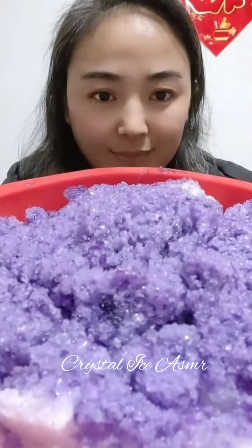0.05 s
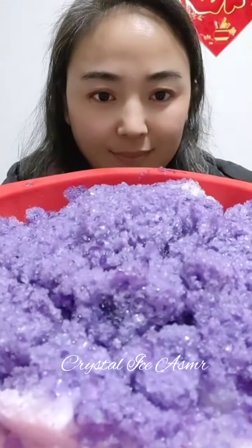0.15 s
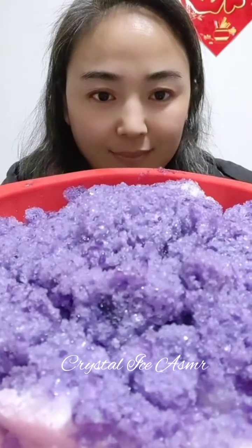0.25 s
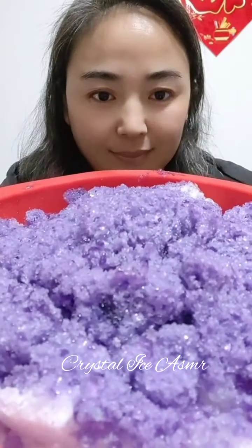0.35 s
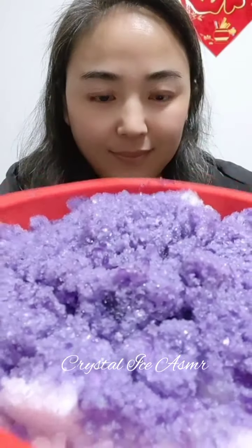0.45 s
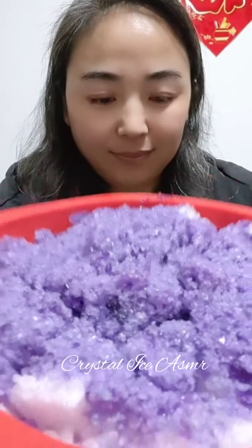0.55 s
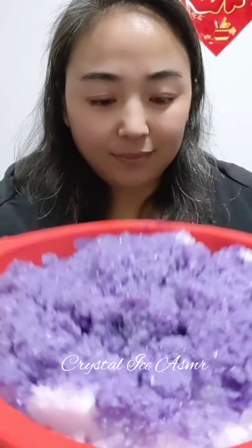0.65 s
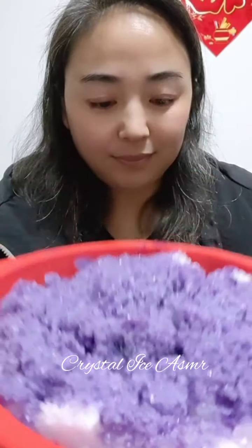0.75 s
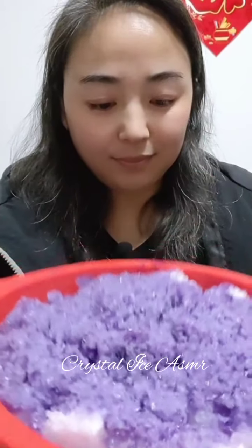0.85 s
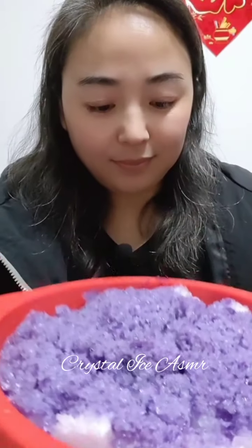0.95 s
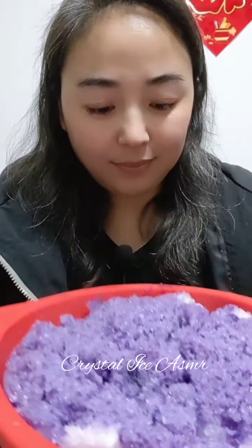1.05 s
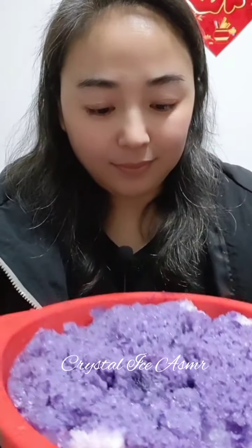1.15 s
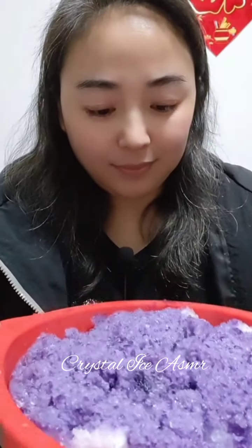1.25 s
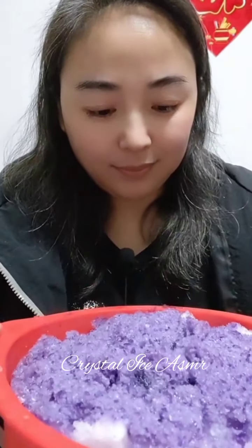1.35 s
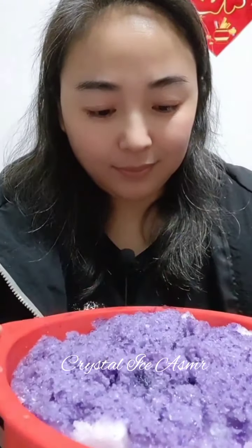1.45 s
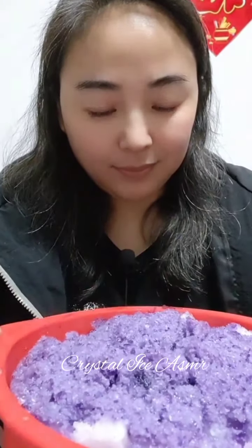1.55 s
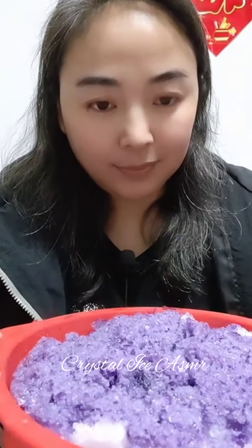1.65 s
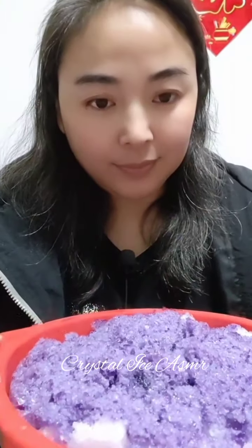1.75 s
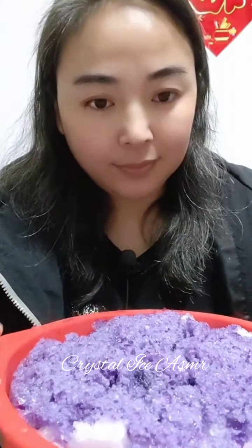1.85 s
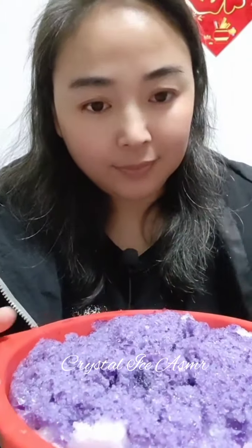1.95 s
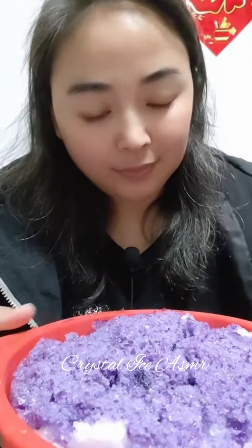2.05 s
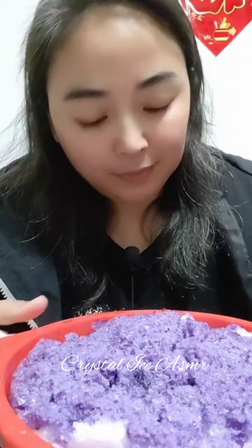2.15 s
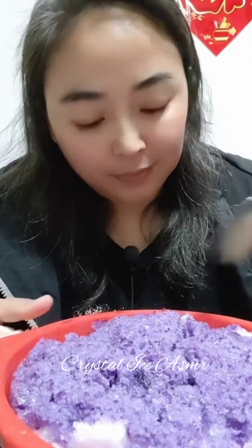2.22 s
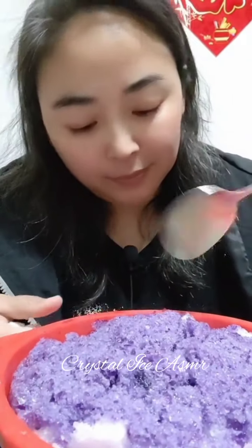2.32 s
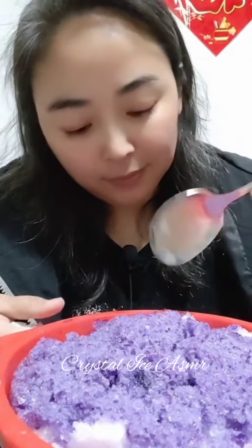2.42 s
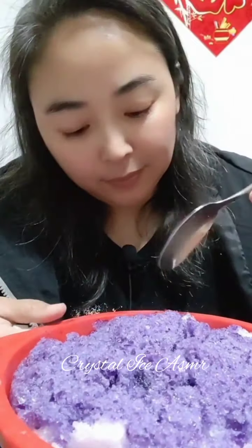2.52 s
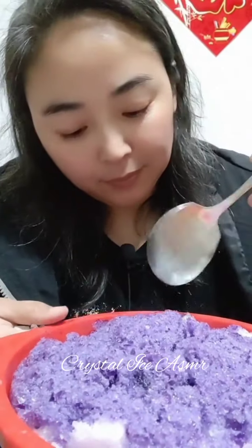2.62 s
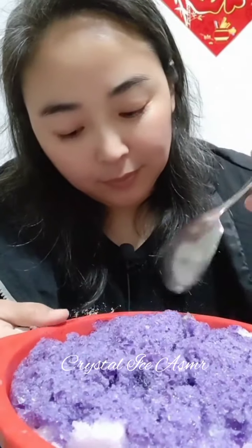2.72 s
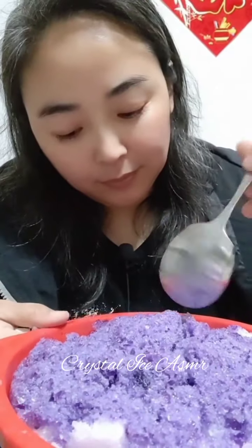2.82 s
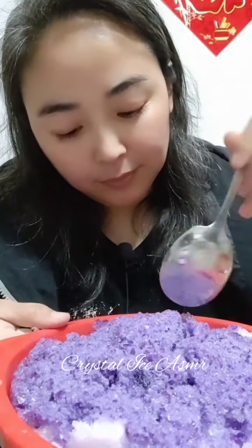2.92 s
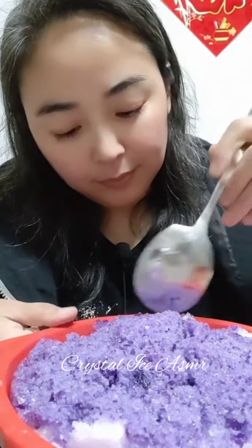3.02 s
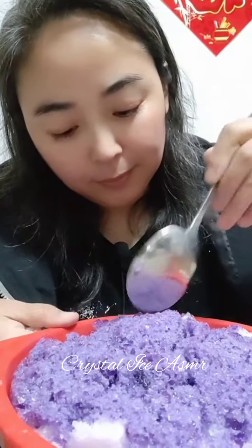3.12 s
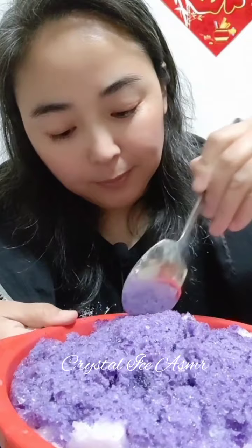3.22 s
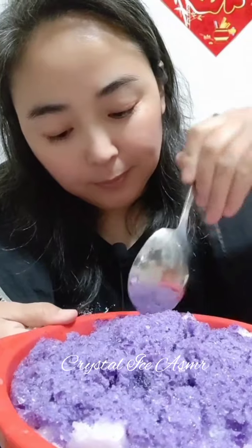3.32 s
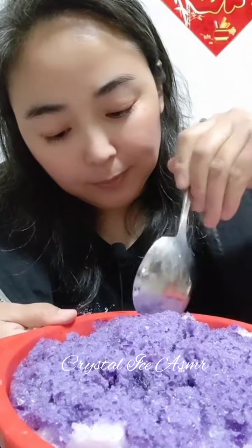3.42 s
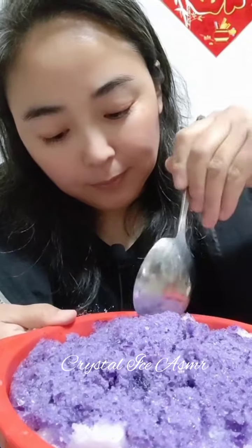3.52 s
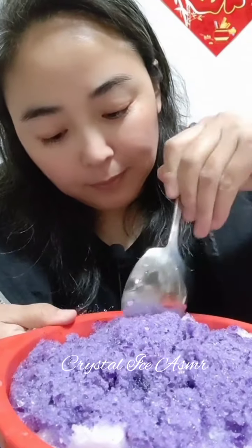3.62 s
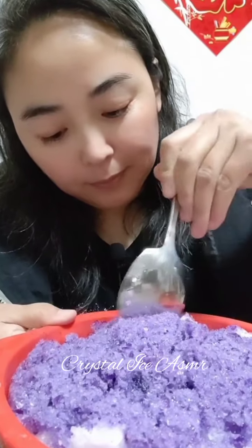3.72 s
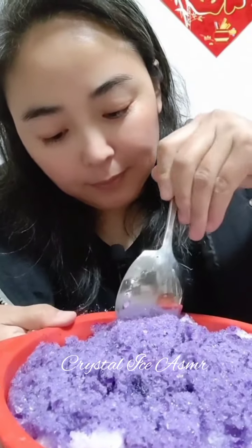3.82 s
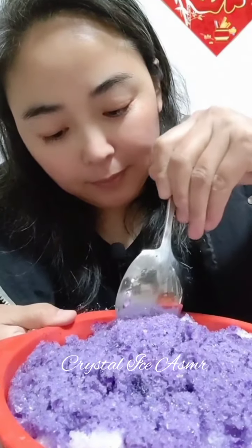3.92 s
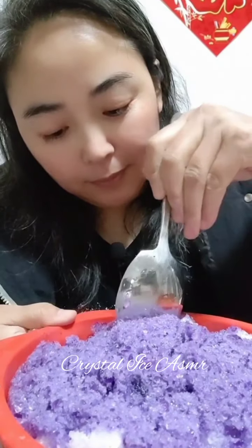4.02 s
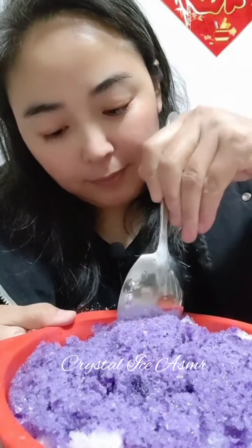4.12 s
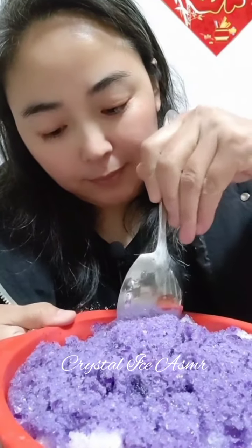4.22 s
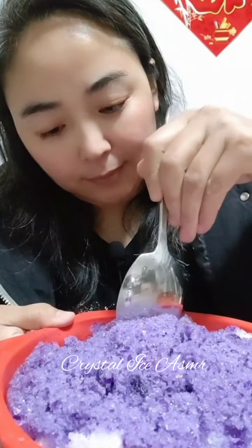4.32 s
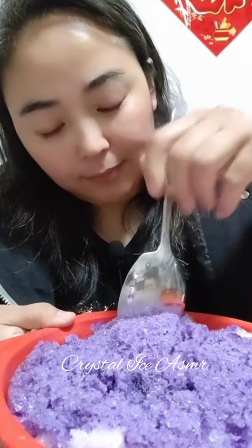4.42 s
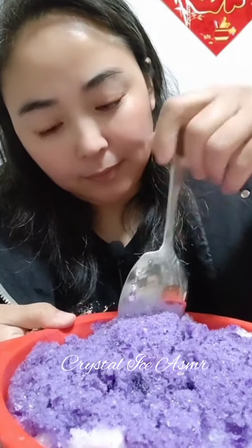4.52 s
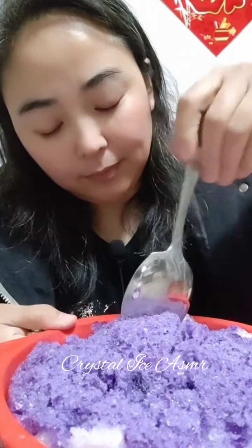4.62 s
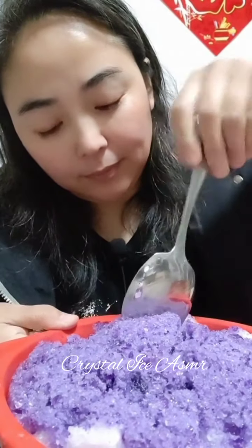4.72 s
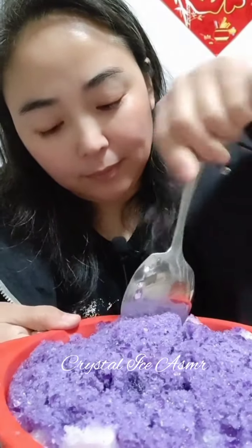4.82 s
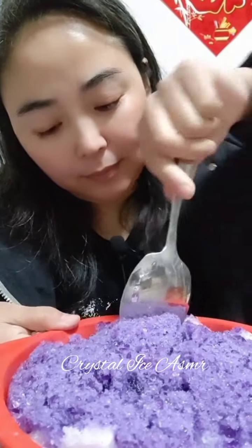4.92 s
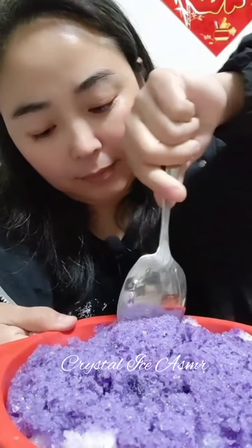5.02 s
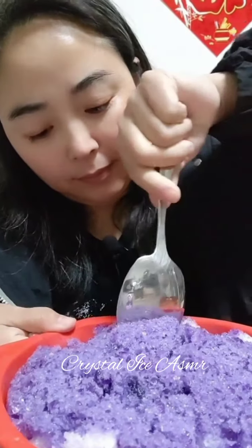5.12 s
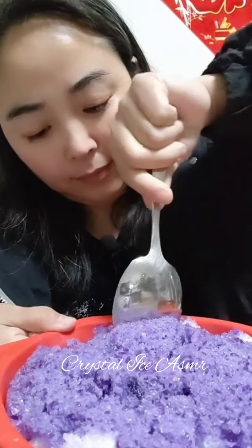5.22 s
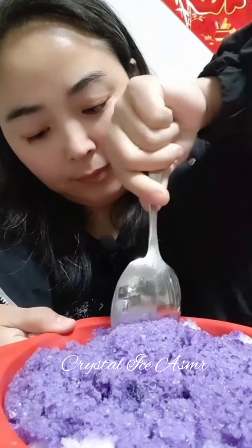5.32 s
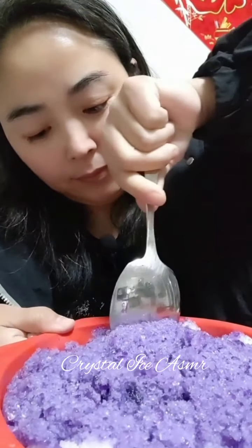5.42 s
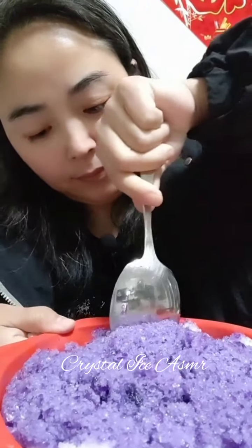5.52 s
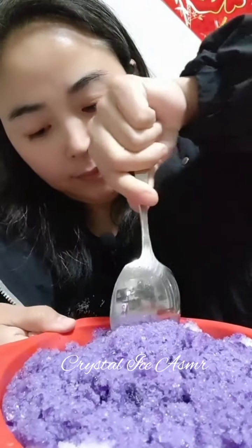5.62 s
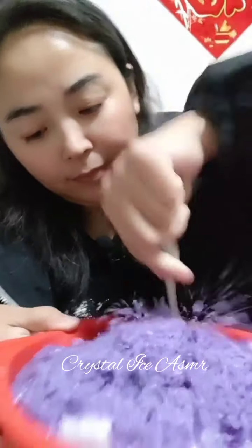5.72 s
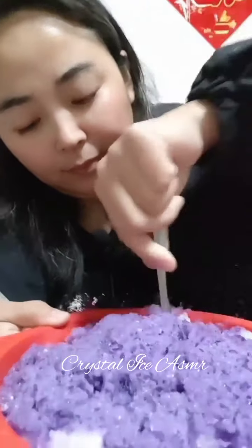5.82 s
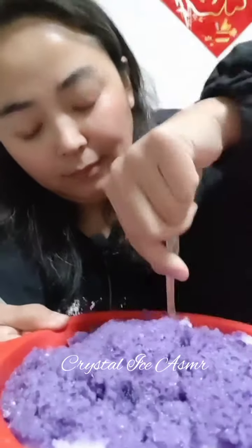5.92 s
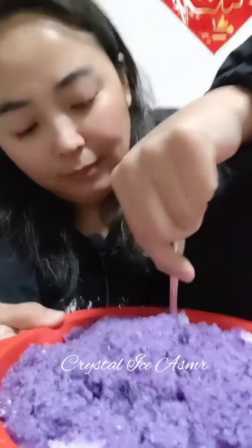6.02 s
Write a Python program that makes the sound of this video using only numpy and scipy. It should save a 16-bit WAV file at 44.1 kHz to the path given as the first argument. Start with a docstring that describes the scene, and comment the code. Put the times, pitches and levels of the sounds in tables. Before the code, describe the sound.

A small furnished room, nearly silent, heard from a microphone on a jacket. At 0 s a faint bowl bump and cloth flick, a tiny bright tick at 0.5, a dull bump near 1.4. From 1.7 to 3.3 fabric rubs and flaps softly, with light bowl taps around 2.8 and 3.1. At 3.3 a steel spoon touches packed shaved ice; gritty slips thicken from 3.6, with a thin, very high steel note fading. A hollow plastic-bowl crack lands at 3.95, a crisp crunch with a thump at 4.25. From 4.35 to 5.0 quieter grinding, creaks and fine crackle. Harder snaps and knocks come at 5.1-5.35 and 5.5, each brief, with low thumps. After small cracks, at 5.83-5.95 the chunk bursts loose: a massive, booming, saturated crunch. A chip clicks at 6.0 as the bowl's ring dies.

```python
"""Small furnished room, microphone on a jacket: cloth rustles as a steel spoon nears a plastic bowl of packed shaved ice.
The spoon sinks in by short gritty slips: random grains excite spoon, ice block and bowl; one thin steel note fades.
Fractures mix noise snaps with damped ice and wall modes; jolts add bowl modes and a low thump.
Finally the spoon is levered hard, a chunk bursts loose and overloads the microphone, and a flung chip lands."""
import sys
import numpy as np
from scipy import signal
from scipy.fft import rfft, irfft, next_fast_len
from scipy.io import wavfile
from scipy.ndimage import uniform_filter1d, map_coordinates

SR = 44100
rng = np.random.default_rng(int(sys.argv[2]) if len(sys.argv) > 2 else 0)


def master(y):
    """Save y as 16-bit WAV."""
    cut = np.clip(np.atleast_2d(y).T, -1, 1)
    pcm = np.round(cut * 32767)  # scale
    wavfile.write(sys.argv[1], SR, pcm.astype(np.int16))


N = 267157
TIME = np.arange(N) / SR


def amp(db):
    """Decibels to gain."""
    return 10 ** (np.asarray(db) / 20)


def unit(x):
    """Scale to rms 1."""
    return x / np.sqrt(np.mean(x ** 2) + 1e-20)


def struck(x):
    """Scale a blow to rms 1 over its first 6 ms."""
    return x / np.sqrt(np.mean(x[:round(0.006 * SR)] ** 2) + 1e-20)


def along(points, hz):
    """Interpolate (Hz, value) points on a log frequency axis."""
    f, v = np.transpose(points)
    return np.interp(np.log(hz + 1), np.log(f + 1), v)


def curves(rows):
    """One value per sample for each column after the time."""
    s, *cols = np.transpose(rows)
    return [np.interp(TIME, s, c) for c in cols]


def wobble(rate):
    """Smooth random curve, rate knots per second."""
    knots = rng.standard_normal(int(N * rate / SR) + 4)
    return map_coordinates(knots, [TIME * rate])


def add(track, s, sound):
    """Mix a sound into a track at time s."""
    part = track[round(s * SR):][:len(sound)]
    part += sound[:len(part)]


def colour(x, spectrum, size=4096):
    """Minimum-phase filter with the given spectrum shape; white input keeps its power."""
    level_db = along(spectrum, np.fft.rfftfreq(size, 1 / SR))
    cepstrum = irfft(np.log(amp(level_db)))
    # folding the cepstrum makes the filter causal
    cepstrum[1:size // 2] *= 2
    cepstrum[size // 2 + 1:] = 0
    response = irfft(np.exp(rfft(cepstrum)))
    return signal.fftconvolve(x, response / np.linalg.norm(response))[:len(x)]


def resonate(x, peaks):
    """Parallel (Hz, width Hz, dB) resonances; white input keeps its power."""
    f = np.fft.rfftfreq(SR // 4, 1 / SR)
    response = irfft(sum(amp(db) * 1j * f * w / (c * c - f * f + 1j * f * w) for c, w, db in peaks))
    return signal.fftconvolve(x, response / np.linalg.norm(response))[:N]


def grains(rate, spread_db, clump_db):
    """Random impulses of rms 1: many small, a few large, bunched into clumps of a few ms."""
    sizes = amp(spread_db * np.minimum(rng.exponential(size=N), 4))
    hits = (rng.random(N) < rate / SR) * rng.choice([-1, 1], N)
    return unit(hits * sizes * amp(clump_db * wobble(230)))


def ring(modes, t, scatter_db, detune):
    """Damped modes, with new strengths and slightly new pitches at every blow."""
    out = 0
    for hz, db, t60 in modes:
        strength, pitch = rng.standard_normal(2)
        decay = amp(db + scatter_db * strength - 60 * t / t60)
        out = out + decay * np.sin(2 * np.pi * hz * (1 + detune * pitch) * t)
    return out


def radiated(x):
    """A thin wall pushes little air below its lowest mode."""
    return signal.sosfilt(signal.butter(4, 170, "highpass", fs=SR, output="sos"), x)


def stroke(start, hold, rise, t60):
    """Gain of one movement: it swells up to start, holds and dies away."""
    swell_db = -20 * (np.maximum(start - TIME, 0) / max(rise, 1e-4)) ** 1.4
    fade_db = -60 * np.maximum(TIME - start - hold, 0) / t60
    return amp(np.maximum(swell_db + fade_db, -150))


# spectrum of the quiet room: f/Hz, relative level/dB
QUIET_SPECTRUM = [(15, -29), (25, 6), (56, -1), (185, -15.5), (301, -19.5), (416, -20), (530, -20),
                  (961, -29.5), (16000, -40)]


def quiet_room():
    """Steady coloured noise under everything."""
    return amp(-65.5) * colour(rng.standard_normal(N), QUIET_SPECTRUM)


# bowl moved, set down, steadied: t/s, level/dB
BOWL_BUMPS = [(0.002, -41), (1.387, -38.5), (1.52, -45), (2.777, -40), (3.087, -40)]
# bowl base modes: f/Hz, relative level/dB, t60/s
BASE_RINGING = [(122, -17.5, 0.3), (333.7, 0, 0.16), (384, 0, 0.089), (527.5, -11, 0.19),
                (1007, -2.5, 0.052)]


def bowl_bumps():
    """Light bumps ring only the damped modes of the bowl's base."""
    out, t = np.zeros(N), np.arange(SR // 2) / SR
    for s, db in BOWL_BUMPS:
        add(out, s, amp(db) * struck(ring(BASE_RINGING, t, scatter_db=2, detune=0.02)))
    return out


# jacket folds flipping over: t/s (sounds 2.04 ms later), relative level/dB, tap f/Hz
JACKET_FOLDS = [(0.009, -28.5, 710), (0.056, -43, 470), (0.697, -43, 647), (0.911, -38.5, 700),
                (0.95, -33, 915), (1.209, -43, 1000), (1.664, -40.5, 680), (1.699, -37.5, 765),
                (1.764, -32, 660), (1.791, -30, 900), (1.812, -30, 860), (1.833, -22.5, 473),
                (1.918, -25.5, 750), (2.185, -31, 930), (2.533, -29.5, 958), (2.583, -28, 456),
                (2.776, -30, 900), (2.888, -38, 486), (3.02, -28, 710), (3.083, -31, 490),
                (3.112, -29, 624), (3.275, -37.5, 650)]
# cloth spectrum: f/Hz, relative level/dB
CLOTH_SPECTRUM = [(40, -18), (220, -8), (350, 1), (750, -1), (1150, -4), (1700, -15), (2100, -14),
                  (2600, -21), (5800, -25), (8000, -37), (11000, -43), (16000, -55)]


def jacket_folds():
    """A flipping fold gives a burst of cloth noise and a dull, quickly damped tap."""
    out, t = np.zeros(N), np.arange(SR // 8) / SR
    for s, db, hz in JACKET_FOLDS:
        rub = rng.standard_normal(len(t)) * (amp(-60 * t / 0.04) + amp(-12 - 60 * t / 0.089))
        tap = np.sin(2 * np.pi * hz * t) * amp(-60 * t * hz / 11)  # t60 is 11 cycles
        flip = struck(colour(rub, CLOTH_SPECTRUM)) + 2.15 * struck(tap)
        add(out, s + 0.00204, amp(db - 8.5) * struck(flip))
    return out


# jacket rubs as the arms move: t/s, hold/s, relative level/dB
JACKET_RUBS = [(0.7, 0.49, -58.5), (1.412, 0.21, -58.5), (1.828, .13, -39.5), (2.052, 0.21, -42),
               (2.32, .3, -39), (2.72, 0.078, -47.5), (3.021, 0.16, -49.5), (3.28, 0.035, -53.5)]
RUB_RISE_S, RUB_T60_S = 0.14, 0.34


def jacket_rubs():
    """Cloth rubs near the microphone: dense grains through the cloth spectrum."""
    power = sum((amp(db) * stroke(s, hold, RUB_RISE_S, RUB_T60_S)) ** 2 for s, hold, db in JACKET_RUBS)
    friction = grains(rate=6000, spread_db=0.5, clump_db=1.9)
    return colour(amp(-3) * np.sqrt(power) * friction, CLOTH_SPECTRUM)


# small bright tick: t/s, level/dB
BRIGHT_TICKS = [(0.51, -44.5)]
# tick spectrum: f/Hz, relative level/dB
TICK_SPECTRUM = [(500, -35), (1700, 7.5), (2400, -21), (3700, 9), (8000, 0.5), (11500, 8), (15000, 7.5)]


def bright_tick():
    """Decaying noise with a bright colour."""
    out, t = np.zeros(N), np.arange(SR // 8) / SR
    for s, db in BRIGHT_TICKS:
        burst = rng.standard_normal(len(t)) * amp(-60 * t / 0.11)
        add(out, s, amp(db) * colour(burst, TICK_SPECTRUM))
    return out


RELEASE_DB, RELEASE_S, SUDDEN_S = 6.5, 0.0027, 0.0053
SLIP_T60_S = 0.047


def slip(s, hold, rise):
    """Gain of one slip: it breaks free, holds while the blade travels, and dies."""
    # stored strain let go at s; the longer the rise against SUDDEN_S, the weaker
    release_db = RELEASE_DB * np.exp(-rise / SUDDEN_S - np.abs(TIME - s) / RELEASE_S)
    return amp(release_db) * stroke(s, hold, rise, SLIP_T60_S)


# blade slips through the ice: t/s, hold/s, rise/s, relative level/dB
BLADE_SLIPS = [(3.325, 0.097, 0.012, -41.5), (3.495, 0.021, 0.011, -45), (3.57, .019, 0.017, -32.5),
               (3.666, .025, 0.00098, -40.5), (3.705, .043, 0.025, -28.5), (3.804, 0.024, 0.016, -29.5),
               (3.905, 0.019, 0.02, -27), (3.981, 0.01, .001, -32), (4.098, 0.012, 0.0054, -41.5),
               (4.252, 0.011, .0013, -23), (4.347, 0.0084, 0.0034, -45), (4.424, 0.031, 0.0011, -42.5),
               (4.517, .023, .007, -39), (4.576, 0.063, .003, -40), (4.677, 0.052, .003, -39),
               (4.762, .063, 0.019, -42.5), (4.894, 0.021, 0.012, -43), (5.004, .016, 0.023, -41.5),
               (5.097, 0.007, .002, -36.5), (5.141, 0.018, .0005, -30), (5.184, 0.012, .003, -37.5),
               (5.335, 0.017, 0.00074, -22.5), (5.502, 0.006, 0.00045, -22), (5.831, 0.033, 0.0021, -17),
               (5.869, .022, 0.0048, -18)]
SLIP_BLOCK_DB, SLIP_BOWL_DB = 3, -4.5  # relative to the grit
# whole ice mass lurches in the bowl: t/s, hold/s, block relative level/dB, bowl relative level/dB
ICE_LURCHES = [(3.956, 0.012, -27.5, -13.5), (4.257, 0.0056, -46, -20), (5.264, .002, -25, -23),
               (5.871, 0.025, -8, -8.5), (5.922, 0.027, -13, -11)]
LURCH_RISE_S, LURCH_T60_S, LURCH_GRIT_DB = 0.0014, 0.13, -27.5  # grit relative to the bowl


def crushing():
    """Slips crush mostly at the blade, lurches mostly at the bowl; gains for grit, block and bowl."""
    slips = sum((amp(db) * slip(s, hold, rise)) ** 2 for s, hold, rise, db in BLADE_SLIPS)
    power = np.outer(amp([0, SLIP_BLOCK_DB, SLIP_BOWL_DB]) ** 2, slips)
    for s, hold, block_db, bowl_db in ICE_LURCHES:
        gains = amp([bowl_db + LURCH_GRIT_DB, block_db, bowl_db])
        power += np.outer(gains, stroke(s, hold, LURCH_RISE_S, LURCH_T60_S)) ** 2
    return np.sqrt(power)


def shifting(x, depth_db):
    """The contact point moves as the blade sinks, so narrow resonances come and go."""
    z = signal.stft(x, nperseg=512)[2]
    field = uniform_filter1d(rng.standard_normal(z.shape), size=3, axis=0)
    field = uniform_filter1d(field, size=18, axis=1)
    gain = amp(depth_db * np.clip(unit(field), -2, 2))
    return signal.istft(z * unit(gain), nperseg=512)[1][:N]


# slow crushing spectrum: f/Hz, relative level/dB
SOFT_SPECTRUM = [(2500, -3), (4500, 1.5), (7000, -5.5), (11000, -2.5), (15000, -13)]
# grit spectrum: f/Hz, relative level/dB
GRIT_SPECTRUM = [(600, -42), (1700, 0), (2400, -15), (3100, -0.5), (3900, -1.5), (5000, -0.5), (6400, -5.5),
                 (8000, -14), (9000, -16), (10600, -18), (12600, -20), (14000, -26), (15200, -18.5)]
# spoon held against the ice: f/Hz, width/Hz, relative level/dB
SPOON_RESONANCES = [(1265, 42, 5), (2054, 62, 3), (2235, 130, 5.5), (3580, 46, -21), (4120, 31, -27),
                    (4420, 110, 2.5), (4420, 38, -14), (5420, 170, -11), (5800, 99, 6), (6200, 250, -1),
                    (6780, 100, 0), (8730, 550, -1), (9380, 200, -0.5), (9970, 80, 3.5), (11280, 1400, -4)]
SINK_START_S, SINK_END_S = 3.62, 3.73
BLADE_FREE_DB, BLADE_BURIED_DB = 2, -7.5  # ring gain


def blade_grit(grit, crush, creep_db, pressed):
    """Crushed crystals sound in the air and through the spoon, which rings less once buried."""
    # slow creep carries less of the highest fizz than a slip
    soft = amp(creep_db - 6.5) * colour(pressed, SOFT_SPECTRUM)
    fine = amp(-4) * grit * crush + soft
    blade_db = np.interp(TIME, [SINK_START_S, SINK_END_S], [BLADE_FREE_DB, BLADE_BURIED_DB])
    blade = resonate(fine * amp(blade_db), SPOON_RESONANCES)
    return shifting(colour(fine, GRIT_SPECTRUM) + blade, depth_db=3)


# packed block spectrum: f/Hz, relative level/dB
BLOCK_SPECTRUM = [(150, -27), (400, -11.5), (600, 4.5), (1150, 6.5), (1450, 1.5), (1850, -10.5),
                  (2300, -12), (4000, -11.5), (9000, -99.5)]
# packed block modes: f/Hz, relative level/dB, t60/s
BLOCK_RINGING = [(382, -16.5, 0.093), (524, 8, 0.024), (554, -31, 0.024), (735, 15.5, 0.042),
                 (1016, 20, 0.052), (1058, 9, 0.025), (1230, 17, 0.029), (1450, -6.5, 0.029)]


def ice_block(block, crush):
    """Crushing grains drive the packed block's broad body and its damped modes."""
    # width from decay time
    peaks = [(hz, np.log(1000) / (np.pi * t60), db) for hz, db, t60 in BLOCK_RINGING]
    ringing = resonate(block * grains(rate=3000, spread_db=2.5, clump_db=1), peaks)
    return amp(-2.5) * colour(block * crush, BLOCK_SPECTRUM) + amp(-8) * ringing


# bowl spectrum: f/Hz, relative level/dB
BOWL_SPECTRUM = [(25, -55), (70, -29), (135, -11), (200, 3), (340, 0.5), (500, 2.5), (750, -11.5),
                 (1500, -20.5), (4000, -107)]


def bowl_lumps(bowl):
    """Lumps shifting against the bowl: grains with its low colour."""
    lumps = grains(rate=2500, spread_db=1, clump_db=2)
    return amp(-0.5) * colour(bowl * lumps, BOWL_SPECTRUM)


# steady pressure between slips: t/s, grit relative level/dB, block relative level/dB
PRESSURE = [(3.3, -52, -43), (3.54, -55.5, -44.5), (3.72, -69, -39.5), (3.9, -55, -41.5),
            (4.03, -58.5, -40), (4.36, -60, -45), (4.62, -45.5, -40.5), (4.97, -57, -40),
            (5.27, -49, -36.5), (5.57, -46.5, -37.5), (5.87, -44, -39), (6.05, -45.5, -28)]
# creak spectrum: f/Hz, relative level/dB
CREAK_SPECTRUM = [(25, -7), (60, -5.5), (140, -6.5), (250, -9.5), (380, -1), (700, -9.5), (1300, -12.5),
                  (2300, -27.5), (5000, -66)]
CRACKLE_PER_S, CRACKLE_DB, CRACKLE_SPREAD_DB = 40, -7, 2


def digging():
    """Crystals crush along the blade and creep under pressure, exciting spoon, block and bowl."""
    grit, block, bowl = crushing()
    creep_db, creak_db = curves(PRESSURE)
    touching = np.clip((TIME - PRESSURE[0][0]) / 0.066, 0, 1)
    crush = grains(rate=9000, spread_db=4.5, clump_db=2)
    creep = grains(rate=2000, spread_db=2.5, clump_db=1)
    # lone crystals giving way
    crackle = amp(CRACKLE_DB) * grains(CRACKLE_PER_S, CRACKLE_SPREAD_DB, clump_db=3.5)
    pressed = touching * (creep + crackle)
    creak = colour(amp(creak_db - 3) * pressed, CREAK_SPECTRUM)
    return blade_grit(grit, crush, creep_db, pressed) + ice_block(block, crush) + creak + bowl_lumps(bowl)


SING_HZ, SING_DB = 10180, -49
SING_S, SING_RISE_S, SING_FADE_DB_PER_S = 3.4, 0.03, 40


def singing():
    """Friction keeps one high mode of the steel ringing, unsteadily, until the ice damps it."""
    phase = 2 * np.pi * SING_HZ * TIME + wobble(130)
    level_db = SING_DB + 2 * wobble(50)
    gain = amp(level_db) * stroke(SING_S, 0, SING_RISE_S, 60 / SING_FADE_DB_PER_S)
    return gain * np.sqrt(2) * np.sin(phase)


# single fractures: t/s, relative level/dB, depth (0 surface, 1 bowl wall)
FRACTURES = [(3.8954, -25.5, 0.52), (3.95, -11, 0.83), (3.982, -11, 0.81), (4.086, -29, 0.4),
             (4.2051, -28, 0.47), (4.502, -35, 0.012), (4.574, -32, 0), (4.611, -31.5, 0),
             (4.628, -32, 0.72), (4.7204, -34.5, 0.17), (5.089, -31.5, .25), (5.104, -24.5, 0.62),
             (5.209, -26, .4), (5.2478, -16, 0.75), (5.258, -16, 0.793), (5.266, -7.5, 0.34),
             (5.6258, -18.5, 0.22), (5.7393, -23, 0.68), (5.8029, -25.5, 0.4), (5.834, -14.5, 0.77),
             (5.902, 2.5, 0.98), (6.015, -23.5, .73)]
# shallow snaps, deeper knocks, deepest pushes the wall: depth, grit/dB, block/dB, bowl/dB
FRACTURE_MIX = [(0, 1.5, -7, -22), (.25, -6.5, -1, -34), (.5, -23, -1.5, -31), (.75, -28, 2, 2),
                (1, -21, -51, 2)]
# bowl wall damped by the ice: f/Hz, relative level/dB, t60/s
WALL_RINGING = [(157, -9, 0.013), (227, -3.5, 0.029), (342.4, 4.5, 0.043), (463, -7.5, 0.041),
                (698, -6.5, 0.038)]


def cracking():
    """A fracture is a sharp snap, a short knock of the block and a push on the bowl, mixed by depth."""
    out, t = np.zeros(N), np.arange(SR // 8) / SR
    depths, *parts = np.transpose(FRACTURE_MIX)
    for s, db, depth in FRACTURES:
        grit_db, block_db, bowl_db = [db + np.interp(depth, depths, part) for part in parts]
        splinters = rng.standard_normal(len(t)) * (amp(-60 * t / 0.0029) + amp(-18 - 60 * t / 0.045))
        snap = struck(colour(splinters, GRIT_SPECTRUM))
        knock = struck(ring(BLOCK_RINGING, t, scatter_db=3, detune=0.03))
        push = struck(radiated(ring(WALL_RINGING, t, scatter_db=2, detune=0.03)))
        add(out, s, amp(grit_db) * snap + amp(block_db) * knock + amp(bowl_db) * push)
    return out


# jolts of the whole bowl: t/s, ring relative level/dB, thump relative level/dB
BOWL_JOLTS = [(3.95, -6.5, -45), (4.262, -45, -21.5), (5.268, -41, -35), (5.336, -28.5, -21),
              (5.513, -26, -13.5), (5.832, -29, -16), (5.889, -7.5, -9)]
# bowl modes: f/Hz, relative level/dB, t60/s
BOWL_RINGING = [(202, -4, 0.079), (211, 1, 0.29), (249.5, -5.5, 0.3), (298, 3.5, 0.077), (322, -13, 0.22),
                (351, -7, 0.32), (453, -5.5, 0.083), (690, -7.5, 0.077)]
THUMP_HZ, THUMP_T60_S, THUMP_RISE_S = 62, 0.057, 0.0042


def bowl_jolts():
    """The plastic wall booms and the loaded bowl thumps on its support."""
    out, t = np.zeros(N), np.arange(SR // 2) / SR
    for s, ring_db, thump_db in BOWL_JOLTS:
        boom = struck(radiated(ring(BOWL_RINGING, t, scatter_db=1, detune=0.0094)))
        swell = 1 - np.exp(-t / THUMP_RISE_S)
        thump = np.sin(2 * np.pi * THUMP_HZ * t) * amp(-60 * t / THUMP_T60_S) * swell
        add(out, s, amp(ring_db + 0.5) * boom + amp(thump_db + 7.5) * thump)
    return out


# flung ice chip lands: t/s, level/dB
CHIP_LANDINGS = [(6.0135, -18)]
# chip modes: f/Hz, relative level/dB, t60/s
CHIP_RINGING = [(1670, -13, 0.013), (2190, 2, 0.0091), (2700, 5, 0.0073), (3280, -6, 0.012)]


def chip_landing():
    """A landing chip clicks in short, damped modes."""
    out, t = np.zeros(N), np.arange(SR // 8) / SR
    for s, db in CHIP_LANDINGS:
        add(out, s, amp(db) * struck(ring(CHIP_RINGING, t, scatter_db=2, detune=0.03)))
    return out


# room decay: f/Hz, t60/s
ROOM_DECAY = [(150, 0.59), (1000, 0.17), (5000, 0.28), (14000, 0.12)]


def room(x):
    """Small furnished room: a noise tail, decaying per frequency, 5 ms after the close sound."""
    hz, t, z = signal.stft(rng.standard_normal(SR // 2), SR, nperseg=256)
    decay = amp(-60 * t / along(ROOM_DECAY, hz)[:, None])
    tail = signal.istft(z * decay, SR, nperseg=256)[1]
    delayed = np.pad(x, (SR // 200, 0))
    return signal.fftconvolve(delayed, tail / np.linalg.norm(tail))[:N]


def scene():
    """Jacket, bowl and ice, with faint reverberation, over the quiet of the room."""
    jacket = jacket_folds() + jacket_rubs()
    bowl = bowl_bumps() + bowl_jolts()
    ice = digging() + singing() + cracking() + chip_landing()
    close = jacket + bowl + ice + bright_tick()
    return (close + amp(-21) * room(close) + quiet_room())[None]


TOP_HZ = 15650


def record(dry):
    """The loudest blows saturate at full scale; then a sharp band limit at TOP_HZ."""
    size = next_fast_len(N + SR // 4)
    passband = np.fft.rfftfreq(size, 1 / SR) < TOP_HZ
    saturated = dry / (1 + np.abs(dry) ** 6) ** (1 / 6)
    return irfft(rfft(saturated, size) * passband, size)[..., :N]


dry = scene()
out = record(dry)
master(out)
```